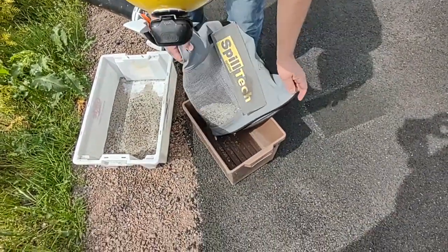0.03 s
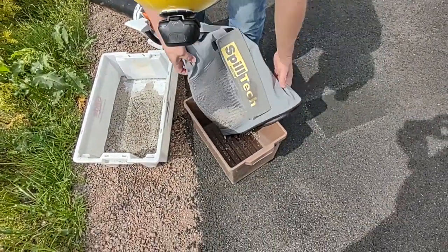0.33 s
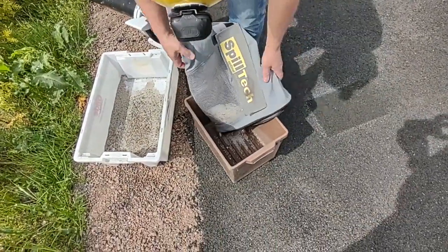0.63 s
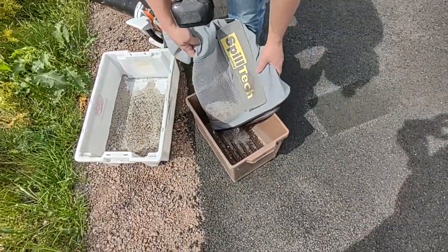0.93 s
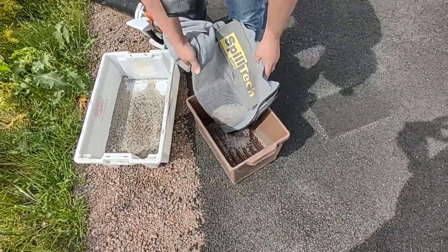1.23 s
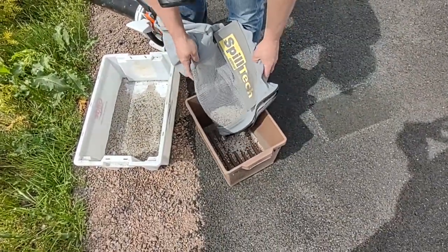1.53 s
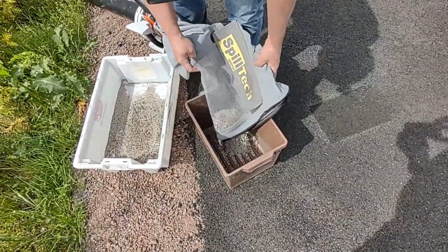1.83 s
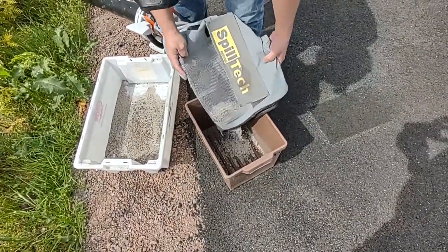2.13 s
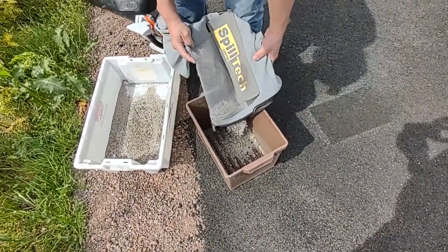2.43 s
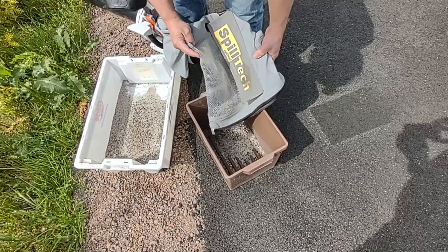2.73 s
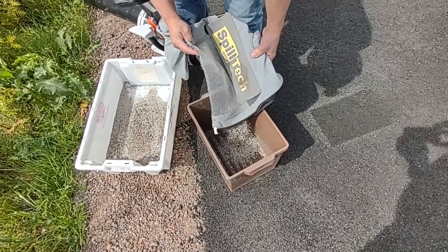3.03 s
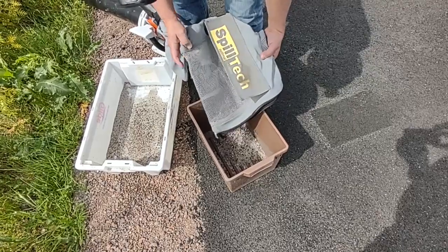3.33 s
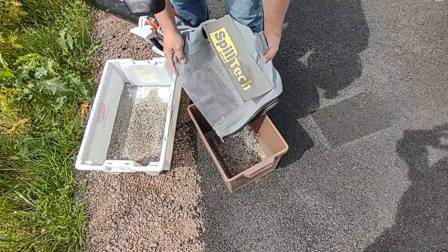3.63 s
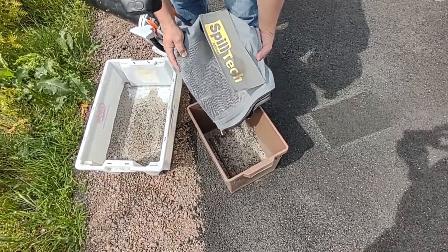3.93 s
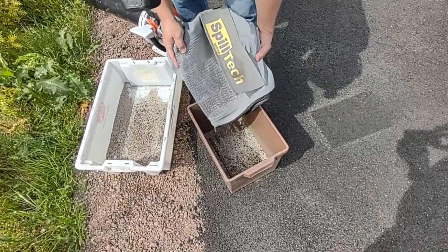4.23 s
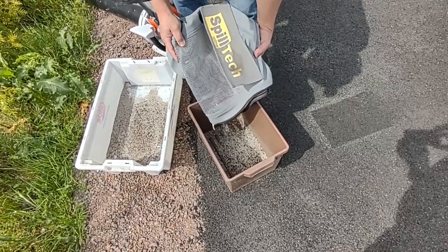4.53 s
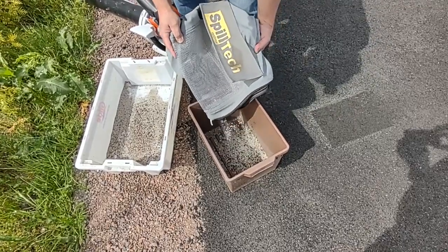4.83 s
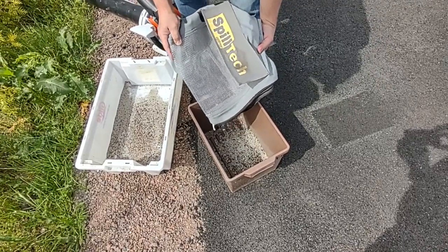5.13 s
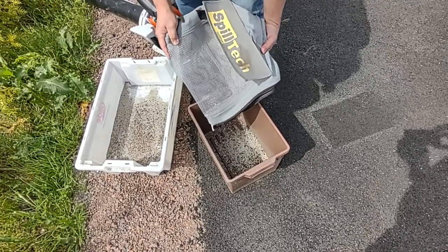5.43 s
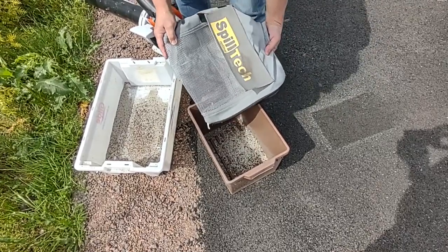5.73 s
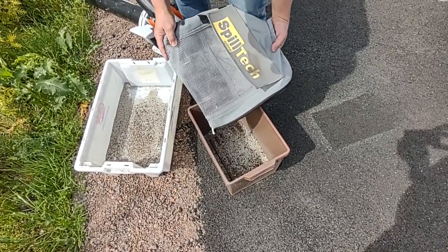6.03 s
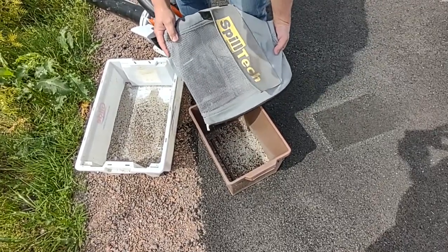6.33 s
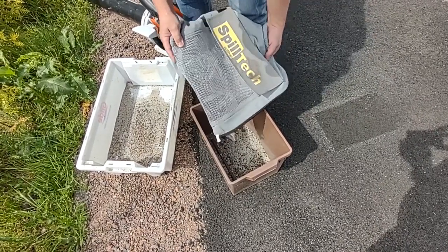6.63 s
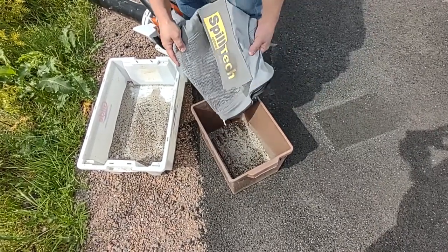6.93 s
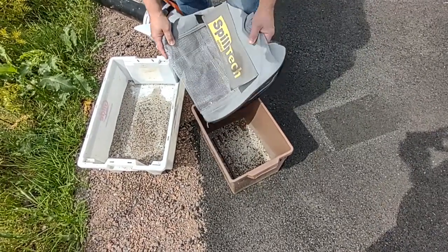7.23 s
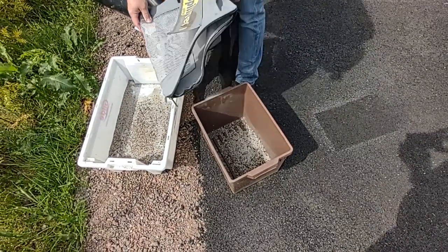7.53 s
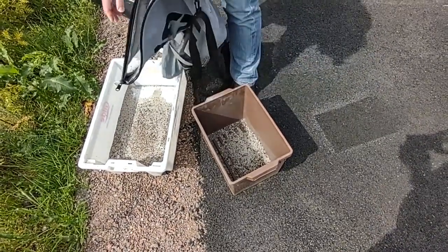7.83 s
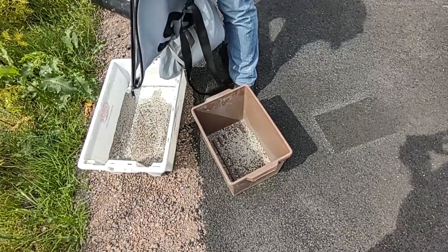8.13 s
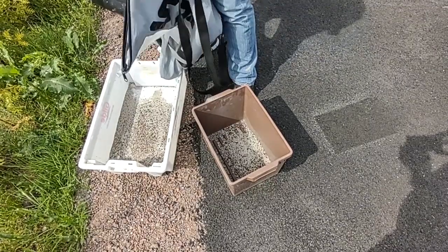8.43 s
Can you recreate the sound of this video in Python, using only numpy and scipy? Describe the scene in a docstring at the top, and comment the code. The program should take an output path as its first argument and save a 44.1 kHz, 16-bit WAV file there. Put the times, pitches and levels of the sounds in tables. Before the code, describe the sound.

Small plastic pellets rattle in surges from a shaken fabric bag into a plastic box, thinning to scattered clicks, with light wind.

```python
"""Small plastic pellets pour from a shaken fabric bag into a plastic box, outdoors on asphalt.
They rattle down in surges, ticking on each other, clacking on the walls and drumming on the floor,
until the last ones drop singly. The gripped bag rubs and rasps, its seams snap, its edge taps the
box, its zip pulls jingle and its buckle clatters. Wind buffets the microphone through the first
half; a far engine hums."""
import sys
import numpy as np
from scipy import signal
from scipy.fft import rfft, irfft, next_fast_len
from scipy.io import wavfile
from scipy.ndimage import uniform_filter1d

SR = 44100
rng = np.random.default_rng(int(sys.argv[2]) if len(sys.argv) > 2 else 0)


def generate_wav(signal):
    """Clip the signal to [-1, 1] and save it as 16-bit WAV at the path in sys.argv[1]."""
    frames = np.transpose(np.atleast_2d(signal))
    scaled = np.clip(frames, -1, 1) * 32767
    pcm = np.round(scaled).astype(np.int16)
    wavfile.write(sys.argv[1], SR, pcm)


N = 383229

# Steady run over the lip of the bag. Each row: time in seconds, relative level in dB.
TRICKLE_LEVELS = [(.7, -54), (.87, -46), (1.0, -42), (2.2, -41.5), (2.55, -44.5), (2.951, -47.5),
                  (3.651, -42.5), (4.13, -44), (4.55, -49.5), (4.95, -54), (5.301, -65)]
# Last pellets sliding in the bag. Each row: time in seconds, pellet and crinkle levels in relative dB.
DREGS_LEVELS = [(5.2, -68, -66), (5.35, -58.5, -70), (5.8, -57, -66.5), (6.4, -64, -68), (6.6, -68, -71.5),
                (6.95, -71.5, -80), (7.35, -64, -69.5), (8.08, -82, -77), (8.68, -92.5, -91)]
# Stream thickness. Each row: time in seconds, impacts per second.
IMPACT_RATES = [(1.17, 1500), (1.27, 800), (1.68, 900), (1.87, 3100), (2.7, 2200), (3.0, 1300), (4.1, 1800),
                (4.8, 1800), (5.05, 700), (5.6, 600), (6.4, 450), (7.3, 800)]
# Hiss of sliding pellets. Each row: frequency in Hz, gain in dB.
SLIDE_SPECTRUM = [(1500, -7.5), (3500, 2), (7000, -5), (10000, -3.5), (11500, 2), (13000, 2.5), (16000, 0)]


def pellet_stream(heap_start_s=3.27, damping_db_per_s=4, hiss_db_per_s=6, thick_per_s=2100):
    """The same impacts make pellets tick, walls clack and the floor drum, over a hiss of sliding."""
    trickle, = gains(TRICKLE_LEVELS)
    surge, on_walls = surges()
    dregs, crinkle = gains(DREGS_LEVELS)
    # The growing heap muffles the floor, and more pellets slide on it.
    heap_s = np.clip(np.arange(N) / SR - heap_start_s, 0, TRICKLE_LEVELS[-1][0] - heap_start_s)
    heap_damping = from_db(-damping_db_per_s * heap_s)
    heap_hiss = from_db(hiss_db_per_s * heap_s)
    ticks = np.hypot(trickle, surge) * from_db(-8) + dregs * from_db(-14.5)
    walls = np.hypot(on_walls, trickle * from_db(-17)) + crinkle * from_db(1)
    floor = np.hypot(surge * from_db(-7.5), trickle * from_db(-3)) * heap_damping + dregs * from_db(-8)
    slide = np.hypot(surge * from_db(-13.5), trickle * from_db(-11.5)) * heap_hiss
    slide += dregs * from_db(-9.5)
    per_s, = in_time(IMPACT_RATES)
    clicks = collisions(per_s, spread_db=4.5, clump_db=2)
    hiss = slide * (per_s / thick_per_s) ** .64 * shaped_noise(SLIDE_SPECTRUM)
    impacts = rattle(clicks * ticks, tick) + rattle(clicks * walls, clack) + rattle(clicks * floor, drum)
    return impacts + hiss


# Shakes of the bag. Each row: start and hold in seconds, relative level in dB, wall share in dB.
SHAKES = [(0.894, 0.29, -36.5, -4), (1.11, 0.065, -33.5, -7.5), (1.268, 0.067, -42, -21),
          (1.462, 0.095, -35.5, -31), (1.64, 0.047, -31.5, -31), (1.749, 0.055, -31.5, -10.5),
          (1.811, 0.082, -28, -7), (1.928, 0.14, -35.5, -9), (2.294, 0.16, -38.5, -9.5),
          (2.58, 0.08, -38.5, -11.5), (3.046, 0.062, -34.5, -10.5), (3.278, 0.06, -36, -15),
          (3.39, 0.11, -35, -6.5), (3.695, 0.056, -38, -10.5), (3.94, 0.012, -34.5, -15),
          (4.28, 0.015, -37.5, -18), (4.606, 0.23, -49.5, -8.5), (4.997, 0.12, -51, -7),
          (5.687, 0.011, -55, -6), (6.297, 0.0055, -60, -8)]


def surges():
    """Each shake sends down a surge; returns the total envelope and the part that hits the walls."""
    total_power = wall_power = 0
    for start_s, hold_s, db, walls_db in SHAKES:
        power = (from_db(db) * swell(start_s, hold_s, attack_s=.029, fall_db_per_s=186)) ** 2
        total_power += power
        wall_power += power * from_db(walls_db) ** 2
    return np.sqrt(total_power), np.sqrt(wall_power)


def collisions(per_s, spread_db, clump_db):
    """Clumped random impacts, none harder than a full fall allows; power levelled over 50 ms."""
    hits = rng.random(N) < per_s * from_db(clump_db * drift(45)) / SR
    force = hits * from_db(spread_db * np.minimum(rng.standard_normal(N), 1.7))
    power = np.abs(uniform_filter1d(force ** 2, SR // 20))
    return force / np.sqrt(power + 1e-4)


def rattle(clicks, contact, spots=32, wander_hz=2.5):
    """The stream wanders over landing spots, a few at a time, each with its own sound."""
    spot = np.round(7 * drift(wander_hz) + 2 * rng.standard_normal(N)).astype(int) % spots
    sounds = [contact() for _ in range(spots)]
    out = np.zeros((2, N))
    for i in np.flatnonzero(clicks).tolist():
        add(out, i / SR, clicks[i] * sounds[spot[i]])
    return out


# Pellet click. Each row: frequency in Hz, gain in dB.
TICK_SPECTRUM = [(1200, -47), (2300, -4.5), (3500, -15.5), (5000, -4.5), (7000, -3), (9500, -2.5),
                 (13000, -3), (16000, -3.5)]
PELLET_HZ = 9610


def tick():
    """Pellet on pellet: hard and bright."""
    crack = impact(TICK_SPECTRUM, crack_s=.001, tail_db=-14, tail_t60_s=.035)
    return with_ring(crack, PELLET_HZ, pitch_spread=.17, width_hz=310, ring_db=9)


# Wall contact. Each row: frequency in Hz, gain in dB.
CLACK_SPECTRUM = [(700, -22.5), (1800, -11), (2500, 8), (3400, 7.5), (4100, 10.5), (4900, 2.5), (6000, 7),
                  (7100, -1), (10000, -40)]


def clack():
    """A pellet skitters on thin plastic wall or stiff fabric, which rings briefly."""
    crack = impact(CLACK_SPECTRUM, crack_s=.0012, tail_db=-10, tail_t60_s=.045)
    return with_ring(crack, centre_hz=4290, pitch_spread=.27, width_hz=130, ring_db=9)


# Box floor. Each row: frequency in Hz, gain in dB.
FLOOR_SPECTRUM = [(200, -23), (400, -11), (560, 2), (720, -2.5), (950, 0.5), (1250, 5.5), (1750, 3),
                  (2150, -2), (3300, -5.5), (4500, -4.5), (7000, -42.5)]


def drum():
    """A pellet drums on the well-damped plastic floor."""
    return impact(FLOOR_SPECTRUM, crack_s=.0014, tail_db=1, tail_t60_s=.055)


# Pellets that land hard. Each row: start in seconds, relative level in dB.
HARD_LANDINGS = [(0.8652, -16), (0.9031, -14.5), (0.9088, -13), (0.9199, -18), (0.9258, -21), (0.9303, -24),
                 (0.9357, -24), (0.9697, -20), (1.0185, -16.5), (1.055, -14), (1.1416, -22),
                 (1.1521, -11.0), (1.1688, -9), (1.1843, -7.5), (1.1913, -13), (1.1963, -17),
                 (1.2258, -14.5), (1.2466, -15), (1.2527, -15.5), (1.2911, -10.5), (1.3346, -16.5),
                 (1.3394, -14), (1.3518, -16), (1.3754, -17), (1.3874, -25), (1.3945, -14.5), (1.406, -19),
                 (1.4525, -16), (1.4582, -18), (1.4657, -23), (1.5076, -19), (1.5131, -12.5), (1.5287, -13),
                 (1.5364, -11.5), (1.5831, -21), (1.5961, -14), (1.6364, -16.5), (1.6897, -12),
                 (1.7648, -10.5), (1.9053, -10.5), (2.0557, -23), (2.079, -20), (2.1849, -18.5),
                 (2.2668, -15.5), (2.2852, -14), (2.3006, -17), (2.3766, -16.5), (2.4741, -20),
                 (2.4845, -18), (2.6088, -19), (3.1332, -31), (3.1607, -34), (3.3264, -18), (3.3405, -12.5),
                 (3.3487, -18.0), (3.357, -14.0), (3.3639, -26), (3.4187, -21), (3.5128, -17.5),
                 (3.5298, -20), (3.5566, -19.5), (3.567, -16.5), (3.67, -20), (3.7133, -19), (3.7226, -20),
                 (3.7348, -15), (3.755, -20), (3.7772, -17), (3.9149, -14.5), (3.928, -16), (3.9568, -19),
                 (3.9892, -17.5), (4.0335, -24), (4.1738, -36), (4.3085, -22), (4.4527, -24), (4.6407, -28),
                 (4.6815, -29), (4.7659, -27.0), (4.9661, -26), (4.982, -24.5), (4.9965, -31),
                 (5.0106, -21.5), (5.0276, -18), (5.0412, -24.0), (5.0663, -22), (5.0707, -21.5),
                 (5.0868, -21.5), (5.1047, -28), (5.1226, -32), (5.2711, -32), (5.3015, -33),
                 (5.3192, -28.5), (5.3271, -29), (5.7053, -22), (5.716, -16), (5.7233, -23.0),
                 (5.7307, -28), (5.7382, -33), (5.7441, -20), (5.748, -24), (5.7716, -37), (5.7795, -35.0),
                 (5.8201, -32.0), (5.8573, -36), (5.872, -39), (5.9026, -37), (5.9214, -37), (5.9258, -48),
                 (6.001, -26), (6.0255, -36), (6.092, -34.5), (6.1936, -36.5), (6.3341, -26),
                 (6.3382, -26.0), (6.3466, -24.5), (6.3536, -28), (6.3648, -34), (6.3743, -33.5),
                 (6.4051, -39), (6.4115, -35), (6.4457, -39.0), (6.4559, -30.5), (6.4874, -38.5),
                 (6.5024, -42), (6.5527, -44.0), (6.5657, -37), (6.6985, -44), (6.8305, -33), (6.8396, -29),
                 (6.9595, -43.5), (7.1786, -44), (7.4532, -45), (7.484, -39), (7.4897, -33), (7.5573, -47),
                 (7.5831, -38), (7.794, -37.5), (7.9008, -33), (8.0911, -48), (8.1378, -52.5)]


def hard_landings(bounce_s=.07, bounce_loss_db=24):
    """Single pellets stand out of the stream and bounce once."""
    out = np.zeros((2, N))
    for start_s, db in list(HARD_LANDINGS) + strays():
        add(out, start_s, from_db(db) * landing())
        add(out, start_s + bounce_s * (.5 + rng.random()), from_db(db - bounce_loss_db) * tick())
    return out


def strays(full_flow_db=-35, full_flow_per_s=20, stray_db=-24):
    """Chance hard landings as (seconds, dB), more frequent and stronger with more flow."""
    trickle, = gains(TRICKLE_LEVELS)
    surge, _ = surges()
    dregs, _ = gains(DREGS_LEVELS)
    flow = np.sqrt(trickle ** 2 + surge ** 2 + dregs ** 2) / from_db(full_flow_db)
    hits = np.flatnonzero(rng.random(N) < full_flow_per_s * flow ** (1 / 3) / SR)
    flow_db = 20 * np.log10(flow[hits])
    return list(zip(hits / SR, stray_db + .81 * flow_db))


def landing():
    """One pellet cracks down and excites wall and floor."""
    crack = impact(TICK_SPECTRUM, crack_s=.0011, tail_db=-15, tail_t60_s=.03)
    crack = with_ring(crack, PELLET_HZ, pitch_spread=.091, width_hz=600, ring_db=6)
    return from_db(-1.5) * crack + from_db(-7.5) * (clack() + drum())


# Sharp knocks: bag seams snap, the buckle and zip tabs strike. Each row: start in seconds, relative level in
# dB, centre in Hz, ring offset in dB.
KNOCKS = [(.019, -23.5, 520, -20), (0.0673, -11, 1200, -28), (.0688, -22, 1950, -17),
          (.097, -24, 900, -20), (0.117, -23, 1100, -25), (.144, -22.5, 1240, -25),
          (.18, -24.5, 900, -17), (0.274, -27, 1100, -20), (0.341, -32, 1680, -22),
          (.542, -28, 1040, -20), (.603, -22.5, 280, -8), (.661, -22.5, 1030, -9),
          (0.7264, -16.5, 830, -14), (3.825, -22, 1090, -24), (3.989, -27, 1300, -22),
          (6.002, -35.5, 2590, -24), (6.406, -37, 3600, -26), (6.457, -34, 3300, -23),
          (6.7, -51, 4000, -22), (6.961, -49, 3770, -18), (7.453, -47, 3980, -14),
          (7.469, -49, 3800, -16), (7.483, -46, 5800, 2), (7.489, -42, 4500, -6),
          (7.584, -35, 960, -10), (7.699, -23.5, 1720, -16), (7.902, -35.5, 3620, -8),
          (8.091, -47, 3520, -8), (8.419, -50, 3600, -13)]


def knocks():
    """Stiff seams of the bag snap and its hard parts knock, each with one broad resonance and a short ring."""
    out = np.zeros((2, N))
    for start_s, db, hz, ring_db in KNOCKS:
        hump = [(hz / 10, -23), (hz / 3, -2), (hz, 0), (hz * 2, -2), (hz * 2.9, -21), (hz * 10, -42)]
        snap = impact(hump, crack_s=.0012, tail_db=-22, tail_t60_s=.06)
        add(out, start_s, from_db(db + 8) * snap)
        add(out, start_s, from_db(db + ring_db) * ringing(hz, t60_s=.015, chatter_s=.0025))
    return out


# Hand slides. Each row: start and hold in seconds, relative level in dB.
HAND_SLIDES = [(-.06, 0.0092, -50.5), (0.031, .005, -46.5), (0.176, 0.023, -49.5), (0.293, 0.044, -44),
               (0.393, 0.01, -44), (0.483, 0.064, -45.5), (0.596, 0.0089, -43)]
# Rubbed fabric. Each row: frequency in Hz, gain in dB.
RUB_SPECTRUM = [(40, -44), (150, -22), (300, -0.5), (650, 3), (1050, 3.5), (1270, -4), (1800, 2),
                (2100, -2), (2700, -2.5), (3300, -13.5), (3600, -14), (6000, -25), (15000, -45.5)]


def fabric_rubs(catch_db=3.5):
    """The weave catches and slips as the hands shift their grip."""
    envelope = movements(HAND_SLIDES, attack_s=.06, fall_db_per_s=104)
    catches = from_db(catch_db * np.minimum(drift(110), 1))
    return from_db(6.5) * envelope * shaped_noise(RUB_SPECTRUM, catches)


# Tightening grips. Each row: start and hold in seconds, level in dB.
GRIPS = [(0.215, 0.032, -47.5), (0.337, 0.041, -43), (0.41, 0.013, -36.5), (0.611, 0.023, -38)]
# Rasping weave. Each row: frequency in Hz, gain in dB.
RASP_SPECTRUM = [(900, -19), (1400, -18), (1780, 1), (2050, 0), (2400, 2.5), (2800, 4), (3050, 0),
                 (3350, -1.5), (3550, -27), (5000, -32.5)]


def fabric_rasps(slips_per_s=150, slip_depth=.32):
    """Under a firm grip the ribbed weave sticks and slips in a quick buzz."""
    envelope = movements(GRIPS, attack_s=.024, fall_db_per_s=330)
    slip_hz = slips_per_s * (1 + .25 * drift(29))
    slips = 1 + slip_depth * np.cos(2 * np.pi * np.cumsum(slip_hz) / SR)
    return envelope * shaped_noise(RASP_SPECTRUM, slips)


# Taps on the rim. Each row: start in seconds, relative level in dB.
RIM_TOUCHES = [(1.808, -31.5), (1.969, -35), (2.185, -42.5), (3.826, -46.5), (5.08, -55), (5.542, -60),
               (5.552, -58), (5.717, -49), (5.724, -56), (5.732, -53), (5.745, -59), (5.85, -58),
               (6.345, -58)]
# Box wall modes. Each row: frequency in Hz, gain in dB, T60 in seconds.
BOX_WALL_MODES = [(580, -6, 0.13), (840, 0.5, 0.053), (1020, 5.5, 0.038), (1170, 1, 0.034),
                  (1480, 1.5, 0.047), (1800, -6, 0.032), (2240, 0, 0.029), (3350, -3, 0.033),
                  (4230, -0.5, 0.033)]


def rim_taps():
    """The edge of the bag taps the box and its walls ring."""
    return struck(RIM_TOUCHES, BOX_WALL_MODES, chatter_s=.003)


# Zip pull touches. Each row: start in seconds, low and high mode levels in relative dB.
ZIP_TOUCHES = [(4.682, -71, -43), (5.336, -66, -46), (5.485, -55, -65), (5.64, -63, -72), (5.83, -62, -52),
               (6.073, -59, -58), (6.192, -76, -46), (6.241, -56.5, -82), (6.295, -67, -55),
               (6.925, -68, -60), (7.136, -68, -61), (7.349, -63.5, -76), (7.429, -67, -66),
               (7.483, -58, -48), (7.512, -70, -59), (7.703, -52, -47)]
# Low and high pull modes. Each row: frequency in Hz, nominal T60 in seconds.
PULL_MODES = [(8120, .045), (14800, .02)]
# Slider modes. Each row: frequency in Hz, gain in dB, nominal T60 in seconds.
SLIDER_MODES = [(3340, 3, 0.023), (5400, 2, 0.015), (6080, 0.5, 0.0041)]


def zip_pulls(uneven_db=2):
    """Metal tabs chatter and ring in two modes; the slider joins in, differently each time."""
    out = np.zeros((2, N))
    for start_s, low_db, high_db in ZIP_TOUCHES:
        modes = [(hz, db, t60_s) for (hz, t60_s), db in zip(PULL_MODES, (low_db, high_db))]
        mean_db = (low_db + high_db) / 2
        for hz, db, t60_s in SLIDER_MODES:
            modes.append((hz, db + mean_db + uneven_db * rng.standard_normal(), t60_s))
        for hz, db, t60_s in modes:
            ring = ringing(hz, t60_s * rng.uniform(.6, 1.8), chatter_s=.0067)
            add(out, start_s, from_db(db + 1) * ring)
    return out


# Strap ring. Each row: start in seconds, frequency in Hz, peak in dB, T60 in seconds.
STRAP_PINGS = [(7.497, 5330, -55, 0.11)]


def strap_ring():
    """A metal ring on the strap pings in one mode."""
    out = np.zeros((2, N))
    for start_s, hz, db, t60_s in STRAP_PINGS:
        add(out, start_s, from_db(db) * ringing(hz, t60_s, chatter_s=.0048))
    return out


# Buckle hits. Each row: start in seconds, relative level in dB.
BUCKLE_TOUCHES = [(7.7005, -36), (7.7098, -48), (7.714, -48), (7.902, -50)]
# Buckle modes. Each row: frequency in Hz, gain in dB, T60 in seconds.
BUCKLE_RESONANCES = [(250, -5, .09), (350, -8, .05), (540, -9, .03), (920, 2, .035), (980, 1, .04),
                     (1060, -2, .03), (1500, -4, .035), (2340, 1, .03), (2590, -7, .025), (3250, -2, .025),
                     (3420, -2, .03), (4450, 0, .02), (5860, -5, .025)]


def buckle():
    """The damped plastic buckle clatters against the box."""
    return from_db(-3) * struck(BUCKLE_TOUCHES, BUCKLE_RESONANCES, chatter_s=.0019)


# Wind strength. Each row: time in seconds, large eddy, small eddy and throb levels in relative dB.
WIND_LEVELS = [(0, -53, -47, -51), (.3, -46, -57.5, -47), (.62, -43.5, -38, -38), (.75, -43.5, -47.5, -42),
               (.9, -41.5, -44, -45), (1.35, -42.5, -44.5, -46), (1.5, -40.5, -36.5, -38),
               (1.62, -37.5, -34, -40), (1.71, -35.5, -31, -47), (1.79, -38, -40.5, -63),
               (1.89, -47, -39, -46), (2.05, -43.5, -45.5, -42.5), (2.2, -50, -46.5, -49),
               (2.33, -44, -50.5, -35.5), (2.52, -40, -48.5, -46), (2.57, -37.5, -40, -28.5),
               (2.64, -30, -38, -40), (2.71, -37, -39, -49), (2.88, -43.5, -47.5, -58),
               (3.6, -48, -50, -62.5), (3.88, -50, -51.5, -48.5), (4.02, -49, -51.5, -73),
               (4.3, -60.5, -63, -75), (4.65, -67, -70, -76)]
# Wind throb. Each row: time in seconds, centre pitch in Hz.
THROB_PITCHES = [(0, 61.2), (1.45, 65.3), (1.65, 82.8), (2.1, 88.7), (2.55, 82.4), (3.0, 94), (3.85, 88.1)]
# Eddy noise, large and small. Each row: frequency in Hz, gain in dB.
LARGE_EDDY_SPECTRUM = [(35, -46), (70, -2), (100, -3.5), (130, 4), (160, -8.5), (195, 2.5), (250, -21.5),
                       (400, -11), (1200, -55.5)]
SMALL_EDDY_SPECTRUM = [(35, -48), (100, -20), (190, -5), (255, 2), (340, -7), (450, -14), (650, -19),
                       (1200, -26), (3000, -46)]


def wind(lumps_db=1.3):
    """Eddies at the microphone make lumpy low noise and a narrow throb of wandering pitch."""
    large_gain, small_gain, throb_gain = gains(WIND_LEVELS)
    pitch_hz, = in_time(THROB_PITCHES)
    large = large_gain * shaped_noise(LARGE_EDDY_SPECTRUM)
    small = small_gain * shaped_noise(SMALL_EDDY_SPECTRUM)
    phase = 2 * np.pi * np.cumsum(pitch_hz * (1 + .07 * drift(12.7))) / SR
    throb = throb_gain * rms_one(np.sin(phase) * from_db(1.5 * drift(22)))
    return (large + small) * from_db(lumps_db * drift(5.9)) + from_db(-1) * throb


# Engine lines. Each row: frequency in Hz, level in dB.
ENGINE_LINES = [(96, -73), (192, -69), (1328, -83)]


def far_engine(waver_hz=4.09):
    """A far engine hums in lines that waver in level and pitch."""
    t = np.arange(N) / SR
    hum = np.zeros(N)
    for hz, db in ENGINE_LINES:
        envelope = 1 + .19 * drift(.99)
        cycles = hz * t + np.cumsum(waver_hz * drift(11)) / SR
        hum += from_db(db) * rms_one(envelope * np.sin(2 * np.pi * cycles))
    return hum


# Outdoor background. Each row: frequency in Hz, gain in dB.
OUTDOOR_SPECTRUM = [(25, -22), (60, -9.5), (95, 2), (150, -2), (192, 4), (235, -2.5), (320, -6),
                    (600, -10.5), (1400, -13.5), (1850, -14), (2200, -21), (3800, -27), (6000, -38.5),
                    (15000, -53)]


def outdoors(level_db=-60):
    """Steady distant murk, mostly bass."""
    return from_db(level_db) * shaped_noise(OUTDOOR_SPECTRUM)


# Spaced microphone ports. Each row: frequency in Hz, left-right coherence.
PORT_COHERENCE = [(100, 0.98), (250, .96), (500, 0.79), (1000, 0.25), (2000, 0.11), (5000, 0.11)]


def air_noise(size):
    """White stereo noise, alike at both ports in the bass and nearly unrelated in the treble."""
    padded = 2 * next_fast_len(size // 2 + 1)
    mid, side = rfft(rng.standard_normal((2, padded)))
    coherence = on_bins(PORT_COHERENCE, padded)
    ports = np.sqrt(1 + coherence) * mid + np.sqrt(1 - coherence) * side * [[1], [-1]]
    return irfft(ports / np.sqrt(2))[:, :size]


def shaped_noise(spectrum, modulation=1):
    """Stereo noise, modulated, then filtered; unit power."""
    return rms_one(coloured(air_noise(N) * modulation, spectrum))


def impact(spectrum, crack_s, tail_db, tail_t60_s, size=1536):
    """One contact: a short crack, then its scatter between the walls; unit energy."""
    t = np.arange(size) / SR
    pulse = (t / crack_s * np.exp(1 - t / crack_s)) ** 6
    bins = rfft(air_noise(size) * pulse)
    local_power = uniform_filter1d(np.abs(bins) ** 2, size=36) / np.sum(pulse ** 2)
    flat_crack = irfft(bins / np.sqrt(local_power + 1e-9))
    tail = air_noise(size) * from_db(tail_db - 60 * t / tail_t60_s) * (t > crack_s)
    return energy_one(coloured(flat_crack + tail, spectrum))


def with_ring(sound, centre_hz, pitch_spread, width_hz, ring_db):
    """Add a brief ring, its pitch set by the pellet's size or the spot it hits; unit energy."""
    hz = np.clip(centre_hz * np.exp(pitch_spread * rng.standard_normal()), 2000, 15500)
    r = np.exp(-np.pi * width_hz / SR)
    feedback = [1, -2 * r * np.cos(2 * np.pi * hz / SR), r * r]
    ring = signal.lfilter(np.array([1, 0, -1]) * (1 - r * r) / 2, feedback, sound)
    return energy_one(sound + from_db(ring_db) * ring)


def ringing(hz, t60_s, chatter_s, size=4096):
    """One mode excited by a short chatter of touches; peak 1."""
    t = np.arange(size) / SR
    touches = rng.standard_normal((2, size)) * np.exp(-t / chatter_s)
    mode = np.sin(2 * np.pi * hz * t) * from_db(-60 * t / t60_s)
    ring = signal.fftconvolve(touches, mode[None], axes=1)[:, :size]
    return ring / np.abs(ring).max(axis=1, keepdims=True)


def struck(touches, modes, chatter_s):
    """Each touch rings all modes of one object."""
    out = np.zeros((2, N))
    for start_s, db in touches:
        for hz, mode_db, t60_s in modes:
            add(out, start_s, from_db(db + mode_db) * ringing(hz, t60_s, chatter_s))
    return out


def swell(start_s, hold_s, attack_s, fall_db_per_s):
    """Envelope of one movement: rise, hold, decay."""
    t = np.arange(N) / SR - start_s
    return np.clip(t / attack_s, 0, 1) * from_db(-fall_db_per_s * np.maximum(t - attack_s - hold_s, 0))


def movements(rows, attack_s, fall_db_per_s):
    """Envelope of several movements, summed in power."""
    swells = (from_db(db) * swell(s, hold_s, attack_s, fall_db_per_s) for s, hold_s, db in rows)
    return np.sqrt(sum(envelope ** 2 for envelope in swells))


def drift(rate_hz, hop=40, settle=2000):
    """Low-passed random curve of unit power."""
    r = np.exp(-2 * np.pi * rate_hz * hop / SR)
    noise = rng.standard_normal(N // hop + settle + 2)
    slow = signal.lfilter([1], [1, -2 * r, r * r], noise)[settle:]
    return np.interp(np.arange(N) / hop, np.arange(len(slow)), rms_one(slow))


def coloured(x, spectrum, size=4096):
    """Minimum-phase filter with the given spectrum."""
    cepstrum = irfft(np.log(from_db(on_bins(spectrum, size))))
    cepstrum[1:size // 2] *= 2
    cepstrum[size // 2 + 1:] = 0
    response = irfft(np.exp(rfft(cepstrum)))
    response = response.reshape((1,) * (x.ndim - 1) + (-1,))
    return signal.oaconvolve(x, response, axes=-1)[..., :x.shape[-1]]


def on_bins(points, size):
    """Interpolate a table over log frequency at the FFT bins."""
    hz, value = np.transpose(points)
    return np.interp(np.log(np.fft.rfftfreq(size, 1 / SR) + 1), np.log(hz), value)


def in_time(rows, **ends):
    """Interpolate each column at every sample."""
    times_s, *columns = np.transpose(rows)
    return [np.interp(np.arange(N) / SR, times_s, column, **ends) for column in columns]


def gains(rows):
    """Level curves as gains, silent outside their span."""
    return [from_db(db) for db in in_time(rows, left=-200, right=-200)]


def add(out, start_s, sound):
    """Mix a sound in at start_s."""
    start = min(max(round(start_s * SR), 0), N - 1)
    out[:, start:start + sound.shape[1]] += sound[:, :N - start]


def from_db(db):
    """Decibels to gain."""
    return 10 ** (np.asarray(db) / 20)


def rms_one(x):
    """Scale to unit power."""
    return x / np.sqrt(np.mean(x ** 2) + 1e-20)


def energy_one(x):
    """Scale stereo to unit mean energy per channel."""
    return x / np.sqrt(np.sum(x ** 2) / 2)


def from_the_right(x, lag_s=.00017):
    """The box stands to the right, so the left port hears it later."""
    left = np.roll(x[0], round(lag_s * SR)) * (np.arange(N) / SR > lag_s)
    return np.array([left, x[1]])


def scene():
    """Pellets, bag and open air."""
    bag = knocks() + rim_taps() + buckle() + zip_pulls() + strap_ring()
    fabric = fabric_rubs() + fabric_rasps()
    pellets = from_the_right(pellet_stream() + hard_landings())
    return pellets + bag + fabric + wind() + far_engine() + outdoors()


# Right port resonances. Each row: frequency in Hz, gain in dB.
RIGHT_PORT_RESPONSE = [(700, 0.5), (1200, -1.5), (1750, 0.5), (2350, -8.5), (3000, 2.5), (3550, 3.5),
                       (4900, 1), (6200, 11.5), (7450, 10.5), (8200, 17.5), (9500, 20.5), (10500, 16.5),
                       (11200, 5), (11800, 2.5), (14000, 16.5), (15100, 8.5), (15600, 15.5), (16000, -5)]
CUTOFF_HZ = 16000


def record(dry):
    """The right port rings in the treble; both channels are low-passed."""
    ports = np.array([dry[0], coloured(dry[1], RIGHT_PORT_RESPONSE)])
    return signal.sosfilt(signal.ellip(10, .2, 80, CUTOFF_HZ, fs=SR, output="sos"), ports)


dry = scene()
out = record(dry)
generate_wav(out)
```